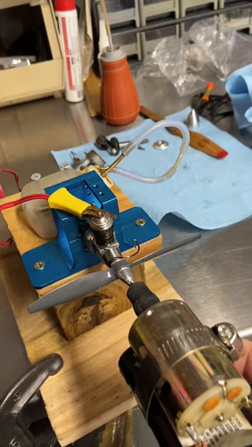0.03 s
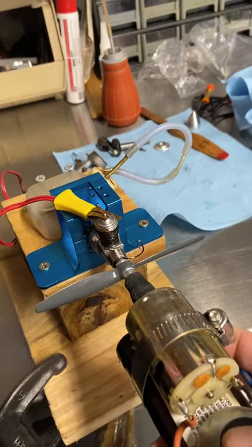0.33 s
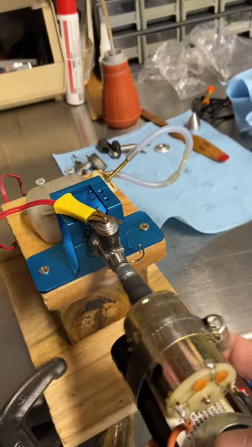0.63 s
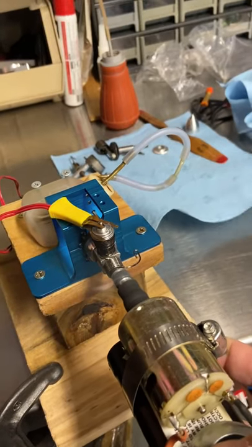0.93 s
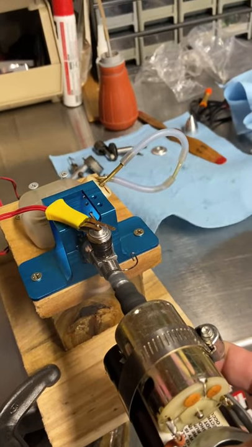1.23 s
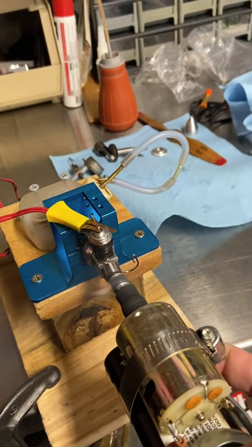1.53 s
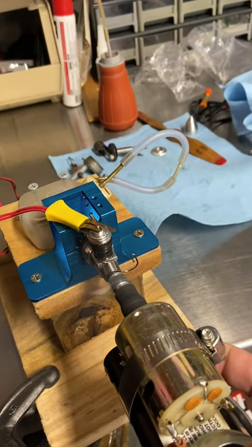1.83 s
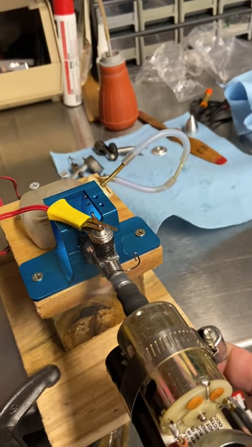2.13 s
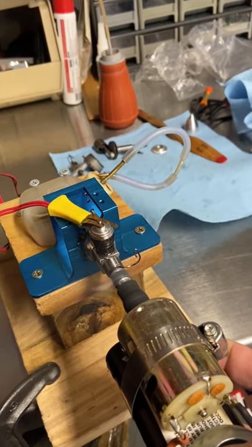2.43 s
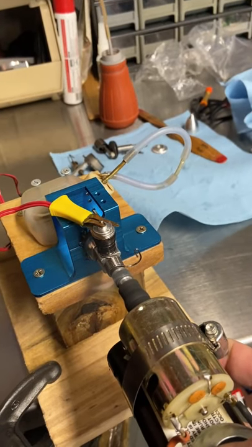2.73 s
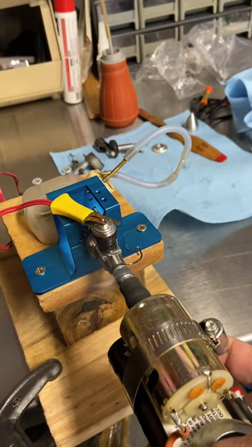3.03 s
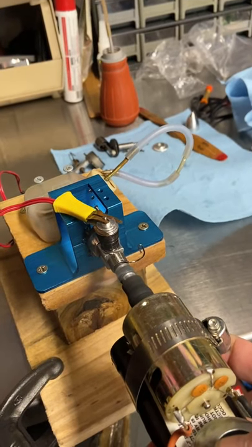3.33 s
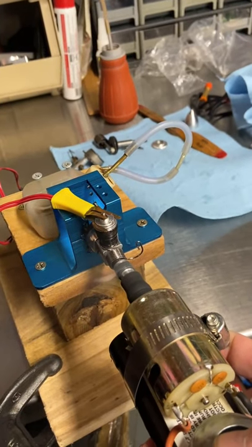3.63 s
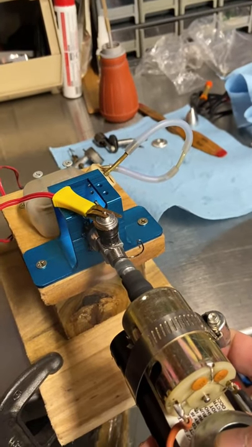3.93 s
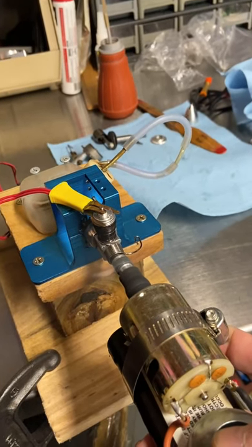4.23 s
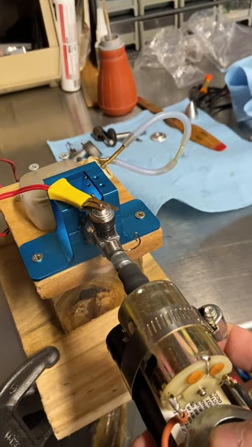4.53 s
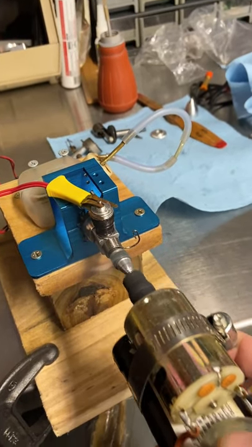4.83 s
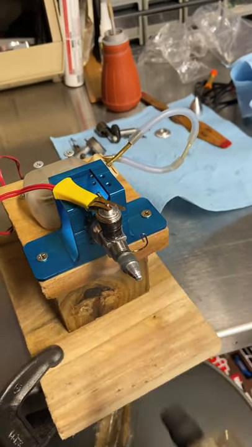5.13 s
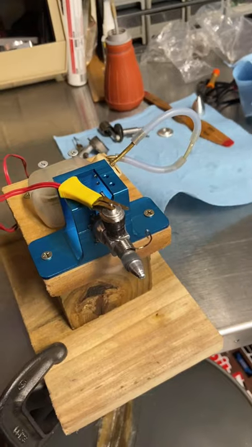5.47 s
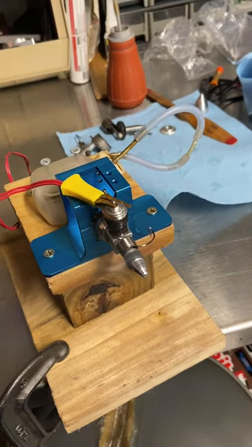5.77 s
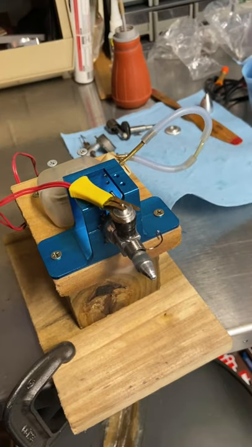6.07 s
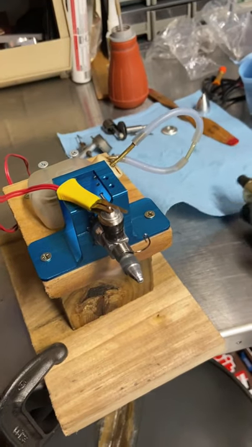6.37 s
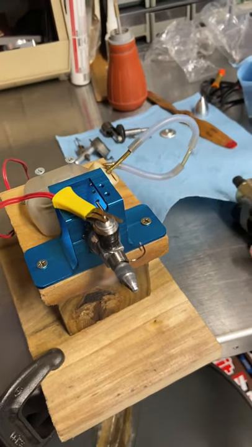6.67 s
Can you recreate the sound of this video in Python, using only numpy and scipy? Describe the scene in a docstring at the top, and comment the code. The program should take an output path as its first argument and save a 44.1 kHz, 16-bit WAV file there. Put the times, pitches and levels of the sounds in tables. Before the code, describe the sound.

An electric starter clicks on and whirs against a tiny model engine, which fires and buzzes loudly and unevenly on its own.

```python
"""Starting a glow engine

In a humming workshop an electric starter clicks on and spins a tiny two-stroke engine clamped to a bench.
The piston's periodic pumping drives the stand, and its knocks ring the crankcase under the gears' whirr.
The engine fires, the starter is pulled away, and a train of exhaust pulses buzzes on alone.
It misses now and then; running rich, it fires only every second turn, doubling the period of the buzz."""
import sys
import numpy as np
from scipy import signal
from scipy.fft import rfft, irfft, next_fast_len
from scipy.io import wavfile
from scipy.ndimage import map_coordinates

SR = 44100
rng = np.random.default_rng(int(sys.argv[2]) if len(sys.argv) > 2 else 0)


def to_wav(sig):
    """Store sig (one row per channel, or 1-D mono) as 16-bit WAV at the path in sys.argv[1].

    Samples outside -1..1 are clipped; the rate is SR.
    """
    pcm = np.clip(np.atleast_2d(sig), -1, 1) * 32767
    pcm = np.round(pcm).astype(np.int16)
    wavfile.write(sys.argv[1], SR, pcm.T)  # frames by channels


N = 295470
T = np.arange(N) / SR

# Levels in the tables are relative.
# room hum: (frequency [Hz], spectral density [dB])
HUM_SPECTRUM = [(15, -28), (25, -24), (51, -8), (69, -3), (86, -8.5), (124, -6), (147, -9), (492, -31.5),
                (1820, -52), (9000, -68), (11700, -103), (19800, -120)]
# decay of the room: (frequency [Hz], reverberation time [s])
ROOM_DECAY = [(200, 0.22), (2000, 0.38), (12000, 0.017)]
# phase between the channels: (frequency [Hz], lead of the left [rad])
LEFT_LEAD = [(30, 0), (400, -.05), (600, -.3), (960, -1.1), (1160, .9), (1600, .2), (4600, 1.2), (5100, .6),
             (6300, 1.9), (7300, 3.14), (9800, 6.1), (10800, 6.4), (13400, 9.4), (16000, 12.1)]
# balance of each source: (frequency [Hz], left minus right [dB])
STARTER_BALANCE = [(60, 0.0), (110, -0.5), (200, -1.0), (380, -4.0), (700, -6.5), (1290, -5.0),
                   (2380, -1.5), (4400, -1.0), (8120, 0.0)]
ENGINE_BALANCE = [(60, -0.5), (110, -1.0), (200, -1.0), (380, -3.5), (700, -6.5), (1290, -1.5),
                  (4400, -1.5), (8120, 0.0)]
# impacts of the starter's cone and switch: (time [s], level [dB])
CLICK_EVENTS = [(0.456, -60), (0.650, -44), (0.662, -34)]
# ring of a click: (frequency [Hz], spectral density [dB])
CLICK_SPECTRUM = [(100, -18), (700, 0), (2500, 0), (4000, -10), (5600, -3), (7500, -10), (15000, -20)]
# speed the starter tends to: (time [s], shaft rate [Hz])
CRANK_SPEED = [(1.0, 185.3), (1.19, 187.3), (2.48, 190.3), (2.77, 192.3), (3.31, 192.5), (3.59, 194.2),
               (4.24, 193.4), (4.38, 194), (4.66, 193.9)]
# cranking layers: (free level [dB], rise while labouring [dB], slope [dB per doubling of speed])
PUMP_LEVELS = (-28.5, 2.85, 10)
GRIND_LEVELS = (-29.5, 4.7, 6.9)
# response of stand and gear case: (frequency [Hz], gain [dB])
STAND_RESPONSE = [(100, -8), (183, 5.5), (189, 1), (380, -5.5), (568, -1), (583, 0.5), (770, 0.55),
                  (945, 2.3), (975, -2), (1150, 2.8), (1340, -5.5), (1530, 3.7), (1730, -3.5), (2080, -14),
                  (2270, -5.5), (2460, -7), (2680, -5), (2870, -12), (3200, -21.5), (3480, -15),
                  (3800, -34), (4220, -9), (4550, -26), (4950, -16.5), (5700, -15.5), (6600, -19)]
# creep of the rubber cone on the spinner: (time [s], slip [turns])
CONE_SLIP = [(1.5, 0.44), (1.9, 0.48), (2.4, 0.88), (2.9, 1.29), (3.3, 1.69), (3.65, 2.14), (4.0, 2.76),
             (4.66, 3.83)]
# beats per slipped turn: order -> (slip at peak [turns], once-a-turn swell [dB], twice-a-turn swell [dB])
SLIP_BEATS = {1: (0.84, 2.2, 0), 2: (0.44, 2.9, 0), 3: (0.24, 2.8, -0.7), 4: (0.555, 2.6, 3.6),
              5: (0.44, 0.8, 1.8), 7: (0.65, 2.7, 2.5), 8: (0.39, 1.1, 0.3)}
# piston knock: (time [s], level [dB])
KNOCK_LEVEL = [(0.68, -29), (0.72, -28), (0.94, -25.5), (2.06, -29.5), (2.83, -29), (2.89, -25.5),
               (3.0, -29.5), (4.68, -29), (4.69, -31)]
# crankcase modes: (frequency [Hz], bandwidth [Hz], level [dB])
CASE_MODES = [(2524, 33, -37), (2610, 310, -5.5), (3560, 98, -8.5), (4290, 580, -8), (4960, 190, 1.5),
              (5700, 287, 6.5), (6630, 110, 2), (8140, 110, -2.5)]
# brushes and gears: (frequency [Hz], spectral density [dB])
WHIRR_SPECTRUM = [(25, -14), (60, -8.5), (130, -5.5), (280, -11), (700, -1), (1200, 1), (2100, 5),
                  (3400, 1.5), (4500, 1.5), (5600, 8), (7400, 2.5), (9200, 1), (11500, 2), (15800, -2)]
# speed of the engine alone, before the dips at misses: (time [s], shaft rate [Hz])
ENGINE_SPEED = [(4.71, 175.2), (4.786, 172.5), (4.924, 152), (5.144, 155), (5.21, 146.6), (5.322, 165.3),
                (5.41, 193), (5.476, 208.8), (5.564, 217.7), (5.614, 222.2), (5.916, 219.6), (6.0, 204.1),
                (6.05, 210.0), (6.104, 203.9), (6.324, 196.4), (6.44, 199.6), (6.584, 215.3), (6.69, 217.5)]
# strength of a firing: (time [s], level [dB])
BURN_LEVEL = [(4.76, -6), (5.2, -8), (5.4, -5), (5.9, -5), (5.96, -8.5), (6.33, -8.5), (6.52, -7.5),
              (6.7, -8.5)]
# runs in which every second turn fails to fire: (time [s], misses [count])
MISFIRE_RUNS = [(4.822, 1), (4.877, 2), (4.909, 2), (4.942, 1), (4.994, 1), (5.669, 1), (5.778, 1),
                (5.846, 1), (5.937, 6), (6.067, 8), (6.155, 24), (6.422, 1), (6.448, 2), (6.606, 3)]
# scatter of ignition: (shaft rate [Hz], standard deviation [s])
IGNITION_JITTER = [(152, 1.6e-5), (170, 4e-6), (200, 2e-6)]
# exhaust pulse after a full charge and after a thin one: (frequency [Hz], level [dB])
FULL_BARK = [(30, -21), (100, -13.5), (230, -9.5), (620, -6.5), (1050, -7.5), (1450, 5.5), (2020, -11.5),
             (2400, 4.5), (3000, -6.5), (3850, 2), (4150, -12), (4700, -11), (5400, -3.5), (7700, -8.5),
             (9500, -21.5)]
THIN_BARK = [(30, -35.5), (400, -20.5), (750, -16.5), (1150, -10.5), (1550, 1.5), (1780, -2.5),
             (2020, -15.5), (2400, 4), (2950, -9), (3800, 2.5), (4300, -8), (6500, -8.5), (7700, -11.5),
             (9500, -20)]
# escaping gas: (frequency [Hz], spectral density [dB])
JET_SPECTRUM = [(25, -48), (100, -13), (700, -3.5), (1500, -1), (2000, 0.5), (2500, 4), (3800, 3),
                (4600, 1.5), (5500, -1.5), (7700, -1), (9200, -5.5), (13000, -17), (15800, -12)]
# resonances of intake and stand: (frequency [Hz], gain [dB])
INTAKE_RESPONSE = [(150, -40), (175, -33), (205, -33), (222, -32), (300, -37), (350, -33), (400, -38.5),
                   (425, -38), (440, -33), (465, -37), (500, -34), (570, -29.5), (620, -35), (655, -76)]

SWITCH_ON_S, CRANK_S, FIRE_S = 0.657, 0.679, 4.705


def amp(db):
    """Amplitude grows tenfold for every 20 dB."""
    return 10 ** (np.asarray(db) / 20)


def unit(x):
    """Normalisation to an rms of 1."""
    return x / np.sqrt(np.mean(x ** 2) + 1e-20)


def along(points, hz):
    """Interpolation on a logarithmic frequency axis."""
    freqs, values = np.transpose(points)
    return np.interp(np.log(hz + 1), np.log(freqs + 1), values)


def curve(points):
    """Linear interpolation in time, one value a sample."""
    return np.interp(T, *np.transpose(points))


def drift(rate, t=T):
    """Slow random modulation: a spline through rate Gaussian knots a second."""
    return map_coordinates(rng.standard_normal(int(t[-1] * rate) + 4), [t * rate])


def filtered(x, response):
    """Linear filtering multiplies the spectrum by a frequency response."""
    size = 2 * next_fast_len(N // 2 + SR // 4)
    return irfft(rfft(x, size) * response(np.fft.rfftfreq(size, 1 / SR)), size)[..., :N]


def coloured(x, spectrum):
    """Minimum-phase filtering: folding the cepstrum makes the ring follow the blow."""
    cepstrum = irfft(np.log(amp(along(spectrum, np.fft.rfftfreq(8192, 1 / SR)))))
    half = len(cepstrum) // 2
    folded = np.r_[cepstrum[0], 2 * cepstrum[1:half], np.zeros(half)]
    return signal.oaconvolve(x, irfft(np.exp(rfft(folded))))[:N]


def noise(spectrum, gate=1):
    """Source and filter: gated white noise is coloured, then normalised."""
    return unit(coloured(gate * rng.standard_normal(N), spectrum))


def pulses(times, sizes):
    """Band-limited impulses: windowed sincs can fall between samples."""
    at = times[:, None] * SR
    taps = np.floor(at).astype(int) + np.arange(-7, 9)
    shape = np.sinc(taps - at) * np.cos(np.pi * (taps - at) / 16) ** 2
    return np.bincount(np.clip(taps, 0, N).ravel(), (sizes[:, None] * shape).ravel(), N + 1)[:N]


def puffs(blows, life_s):
    """Exponential decay after each blow, with time constant life_s."""
    return signal.lfilter([1], [1, -np.exp(-1 / (life_s * SR))], blows)


def room(x):
    """Reverberation: a diffuse stereo tail whose high treble dies first."""
    hz, t, spectra = signal.stft(rng.standard_normal((2, SR // 3)), SR, nperseg=256)
    decay = amp(-60 * t / along(ROOM_DECAY, hz)[:, None])
    tail = signal.istft(spectra * decay, SR, nperseg=256)[1]
    delayed = np.pad(x, (SR // 400, 0))
    return signal.fftconvolve(delayed[None], tail / np.linalg.norm(tail[0]), axes=1)[:, :N]


def stereo(x, balance):
    """A wave reaches two spaced receivers with differences of level and phase."""
    half = np.array([[.5], [-.5]])
    return filtered(x, lambda hz: amp(half * along(balance, hz)) * np.exp(1j * half * along(LEFT_LEAD, hz)))


def workshop_hum():
    """Ambient noise: low frequencies under slight amplitude modulation."""
    return amp(-61.5 + 1.9 * drift(5.4)) * noise(HUM_SPECTRUM)


def clicks():
    """Impact transients: the cone touches the spinner, then the switch closes."""
    times, db = np.transpose(CLICK_EVENTS)
    ring = amp(-4) * puffs(pulses(times, amp(db)), life_s=0.011) * noise(CLICK_SPECTRUM)
    return stereo(ring + amp(-11) * room(ring), STARTER_BALANCE)


def shaft(speed, start):
    """Rotation is the integral of speed: turns since start, and the time of each whole turn."""
    turns = np.cumsum(speed) / SR
    turns -= np.interp(start, T, turns)
    return turns, np.interp(np.arange(int(turns[-1]) + 1), turns, T)


def cranking(spin_up_s=0.064, labour_until_s=1.36, ease_s=0.21, kick_s=0.0322, kick_hz=14, kick_db=-6):
    """First-order spin-up; levels follow speed and load, and dip as the engine kicks back before firing."""
    risen = 1 - np.exp(-np.maximum(T - SWITCH_ON_S, .001) / spin_up_s)
    labour = np.clip(1 - (T - labour_until_s) / ease_s, 0, 1)
    kick = np.clip((T - FIRE_S) / kick_s + 1, 0, 1)
    level = lambda free, rise, slope: free + rise * labour + slope * np.log2(risen) + kick_db * kick
    return curve(CRANK_SPEED) * risen - kick_hz * kick, level(*PUMP_LEVELS), level(*GRIND_LEVELS)


def pumping_drone(turns, speed, pump_db):
    """Forced vibration: shaft harmonics pass through the stand and beat as the cone slips."""
    t, speed, pump_db, slip = (x[::256] for x in (T, speed, pump_db, curve(CONE_SLIP)))
    drone = np.zeros(N)
    for order in range(1, 35):
        drift_db, flutter_db = (2.4, 2.5) if order >= 9 else (0.7, 0.6)
        db = pump_db - 4.5 + along(STAND_RESPONSE, order * speed) + drift_db * drift(6.13, t)
        db += flutter_db * np.cos(2 * np.pi * (order * slip + rng.random()))
        if order >= 12:  # the gear orders bite under load
            db += 0.7 * np.maximum(pump_db - PUMP_LEVELS[0], 0)
        if order in SLIP_BEATS:
            peak, once_db, twice_db = SLIP_BEATS[order]
            beat = 2 * np.pi * (slip - peak)
            db += once_db * np.cos(beat) + twice_db * np.cos(2 * beat)
        # higher orders lag in phase, spreading each stroke in time
        lag = 4 * np.log(order) + 0.37 * np.sqrt(min(order, 12)) * drift(4.02, t)
        phase = 2 * np.pi * order * turns - np.interp(T, t, lag)
        drone -= np.interp(T, t, np.sqrt(2) * amp(db)) * np.cos(phase)
    return drone


def piston_knock(blows):
    """Modal ringing: sharp blows and brief rattles excite the damped modes of the crankcase."""
    hz = np.fft.rfftfreq(2048, 1 / SR)
    response = sum((-1) ** k * amp(db) * 1j * hz * width / (centre ** 2 - hz ** 2 + 1j * hz * width)
                   for k, (centre, width, db) in enumerate(CASE_MODES))
    ring = lambda force: unit(signal.oaconvolve(force, irfft(response))[:N])
    rattle = puffs(blows, life_s=0.00066) * rng.standard_normal(N)
    level_db = curve(KNOCK_LEVEL) + 2 + 1.1 * drift(14)
    return amp(level_db) * (amp(-1.5) * ring(blows) + amp(-7.5) * ring(rattle))


def gear_whirr(blows):
    """Modulated friction noise: brushes and gears grind hardest against compression."""
    return noise(WHIRR_SPECTRUM, gate=1 + 0.22 * unit(puffs(blows, life_s=0.0007)))


def stand_jolt(blows):
    """Transient excitation: spin-up jolts the stand into a low shake and a clatter, which then subside."""
    jolt = curve([(.672, 0.3), (.72, 0.91), (.79, 0.58), (.89, 0.026)])
    shake = noise([(25, -40), (42, -24), (56, -4), (75, -16), (200, -12), (600, -73)])
    clatter = noise([(100, -11.5), (400, 3), (700, 5), (1700, -27), (3500, -5), (12000, -14)],
                    gate=puffs(blows, life_s=0.0058))
    return amp(-31) * jolt * shake, amp(-19) * jolt * clatter


def starter():
    """Periodic forcing: each driven turn pumps, knocks and grinds until the engine fires."""
    speed, pump_db, whirr_db = cranking()
    turns, tops = shaft(speed, CRANK_S)
    engaged = np.clip((T - CRANK_S) / .003 + 1, 0, 1) * np.exp(-np.maximum(T - FIRE_S, 0) / .08)
    timing, strength = rng.standard_normal((len(tops), 2)).T
    blows = pulses(tops + 0.000835 + 8e-6 * timing, amp(0.55 * strength))
    metal = piston_knock(blows) + amp(whirr_db) * gear_whirr(blows)
    shake, clatter = stand_jolt(blows)
    rough = engaged * (metal + clatter)
    body = engaged * (pumping_drone(turns, speed, pump_db) + shake)
    return stereo(body + rough + amp(-22.5) * room(rough), STARTER_BALANCE)


def revving(sag_hz=3.0, sag_s=0.022):
    """Loss of torque: the speed dips and recovers at the start of each run of misses."""
    since = np.maximum(T - np.array(MISFIRE_RUNS)[:, :1], 0) / sag_s
    dips = since * np.exp(1 - np.minimum(since, 20))
    return curve(ENGINE_SPEED) - sag_hz * dips.sum(0)


def firing_turns(tops):
    """Period doubling: in a run of misses only every second turn fires."""
    fires = np.ones(len(tops), bool)
    for start, count in MISFIRE_RUNS:
        first = np.argmin(abs(tops - start))
        fires[first:first + 2 * int(count):2] = False
    return fires


def exhaust_bark(times, sizes, rate, fires):
    """Pressure pulses coloured by the charge: a slow turn, or a miss before it, fills the cylinder."""
    fill = np.where(np.roll(fires, 1), np.interp(rate, [188, 208], [1, 0]), 1)
    full = coloured(pulses(times, sizes * fill), FULL_BARK)
    thin = coloured(pulses(times, sizes * (1 - fill)), THIN_BARK)
    # the port opens gradually: lows leave first, the crack follows
    delay_s = lambda hz: .00075 * np.minimum(hz / 4000, 1)
    return unit(filtered(full + thin, lambda hz: np.exp(-2j * np.pi * np.cumsum(delay_s(hz)) * hz[1])))


def gas_jet(times, sizes, rate):
    """Turbulent noise follows each pulse; at low speed the charge lights unevenly and sputters more."""
    sputter = amp(np.interp(rate, [160, 174, 210], [0, -2.5, -4]))
    return noise(JET_SPECTRUM, gate=puffs(pulses(times + .0004, sizes * sputter), life_s=.0019))


def intake_throb(turns, speed, burn_db):
    """Resonance: the piston's three lowest harmonics sweep through the peaks of intake and stand."""
    throb = sum(amp(along(INTAKE_RESPONSE, order * speed)) * np.cos(2 * np.pi * order * turns)
                for order in (1, 2, 3))
    return -np.sqrt(2) * amp(5.5 + 0.86 * burn_db) * throb


def engine(catch_s=0.053, catch_db=3.4, miss_db=-17.6):
    """A pulse train at the shaft rate: the piston pumps every turn, but a miss barks only faintly."""
    speed = revving()
    # the first firings burn the fuel gathered while cranking
    burn_db = curve(BURN_LEVEL) + catch_db * (T < FIRE_S + catch_s)
    turns, tops = shaft(speed, FIRE_S)
    strength, timing = rng.standard_normal((len(tops), 2)).T
    fires = firing_turns(tops)
    sizes = amp(np.interp(tops, T, burn_db) + 0.68 * strength + miss_db * ~fires)
    rate = np.interp(tops, T, speed)
    times = tops + np.interp(rate, *np.transpose(IGNITION_JITTER)) * timing
    exhaust = amp(-26) * exhaust_bark(times, sizes, rate, fires) + amp(-39.5) * gas_jet(times, sizes, rate)
    running = np.clip((T - FIRE_S) / 0.0019, 0, 1)
    rattle = amp(-38) * noise(WHIRR_SPECTRUM)  # piston and crank
    body = running * (intake_throb(turns, speed, burn_db) + rattle)
    return stereo(exhaust + body + amp(-10) * room(exhaust), ENGINE_BALANCE)


def scene():
    """Superposition: the pressures of the four sources add."""
    return workshop_hum() + clicks() + starter() + engine()


def record(dry, cutoff_hz=15850):
    """Band limiting: a steep low-pass removes the highest treble."""
    return filtered(dry, lambda hz: 1 / (1 + (hz / cutoff_hz) ** 200))


dry = scene()
out = record(dry)
to_wav(out)
```